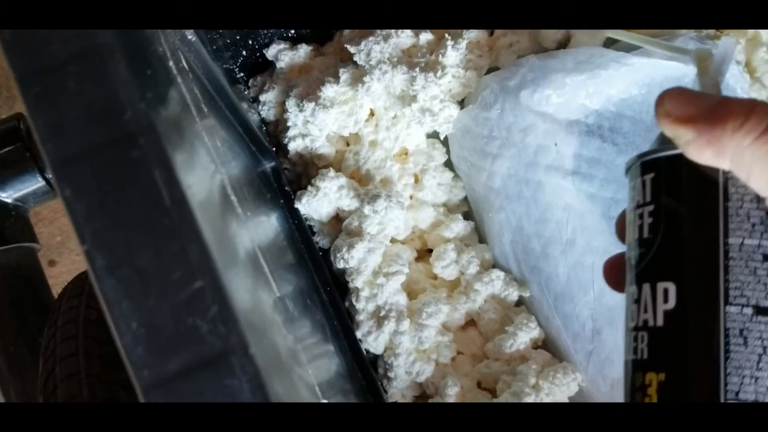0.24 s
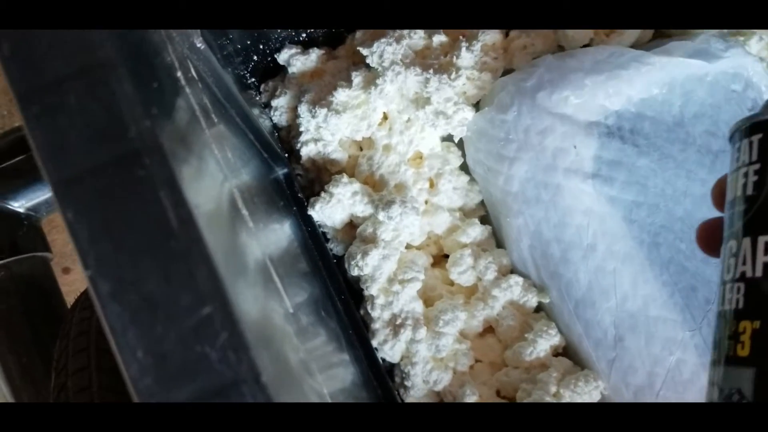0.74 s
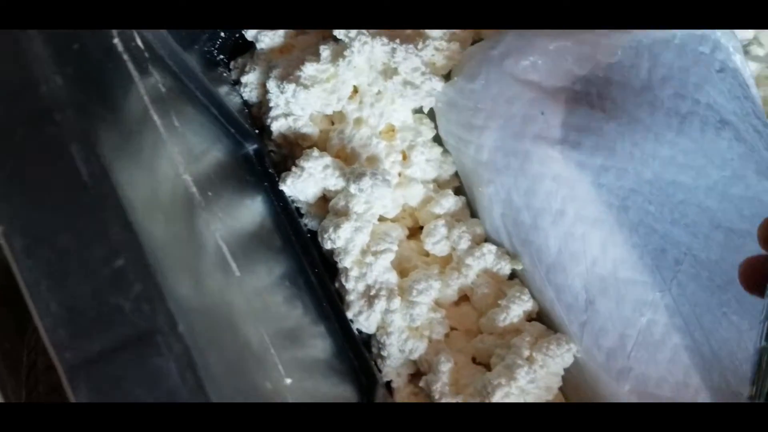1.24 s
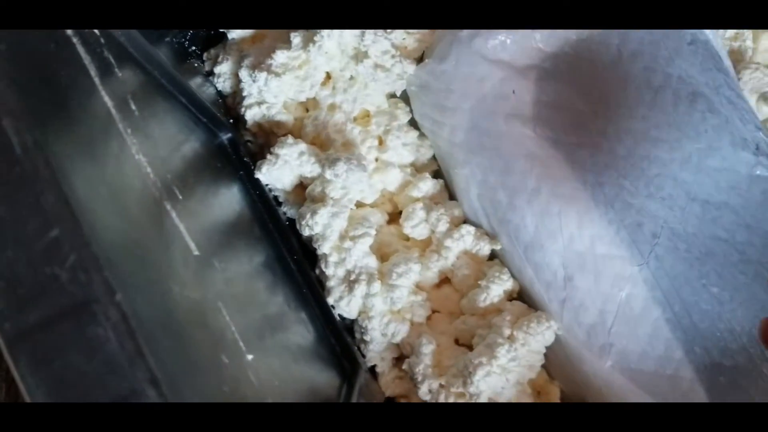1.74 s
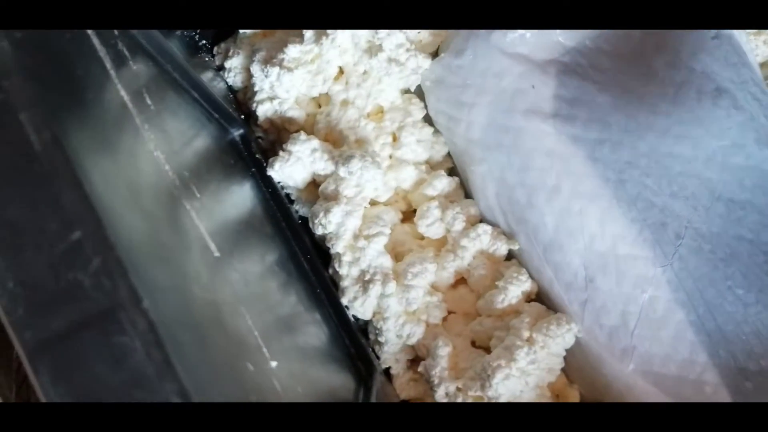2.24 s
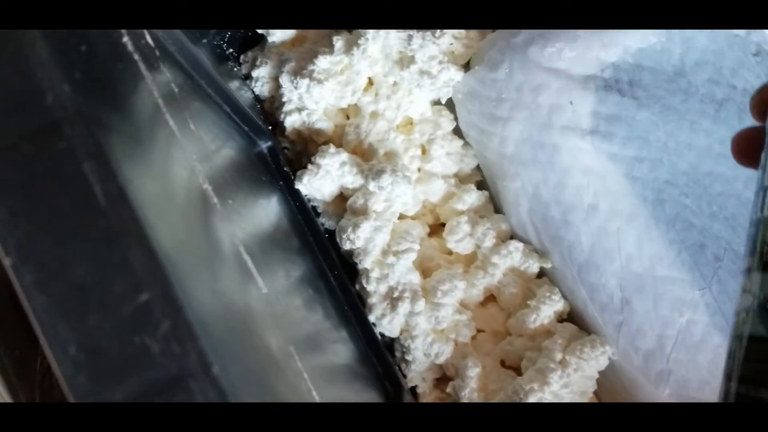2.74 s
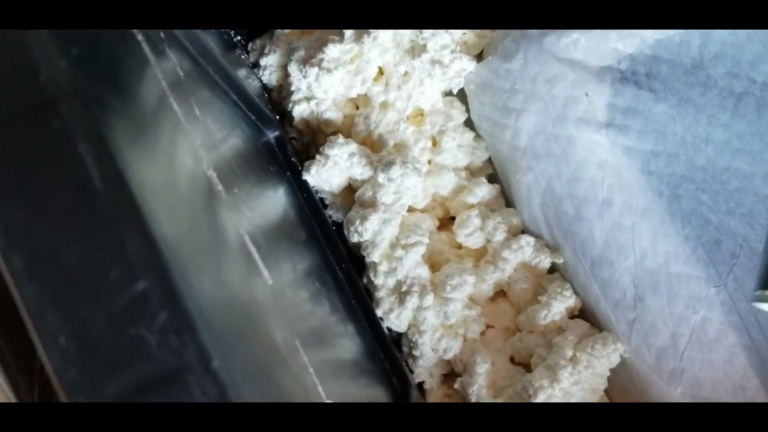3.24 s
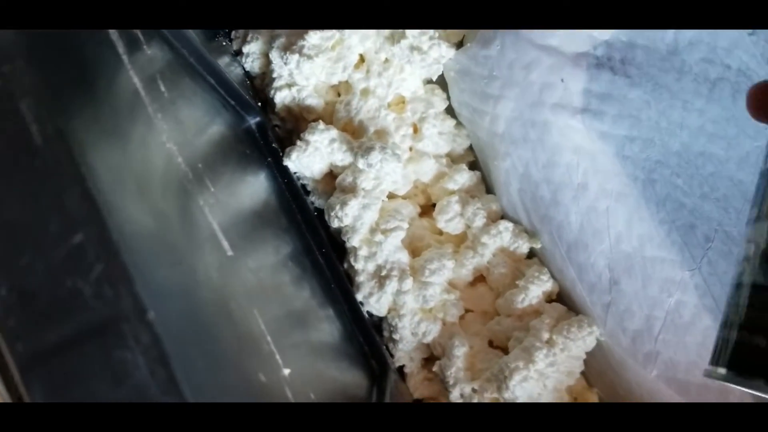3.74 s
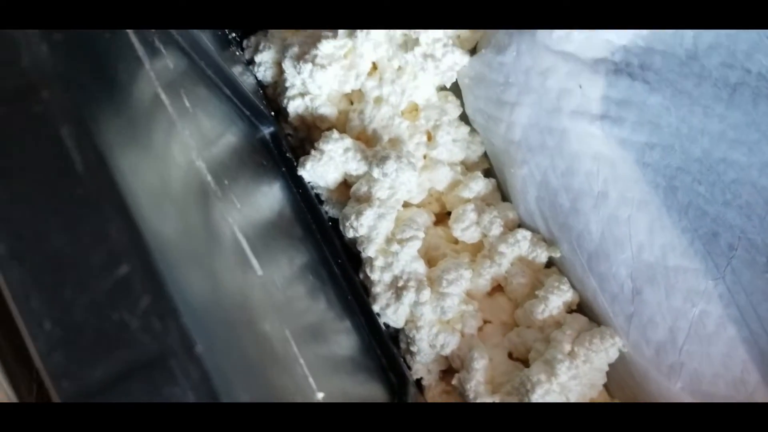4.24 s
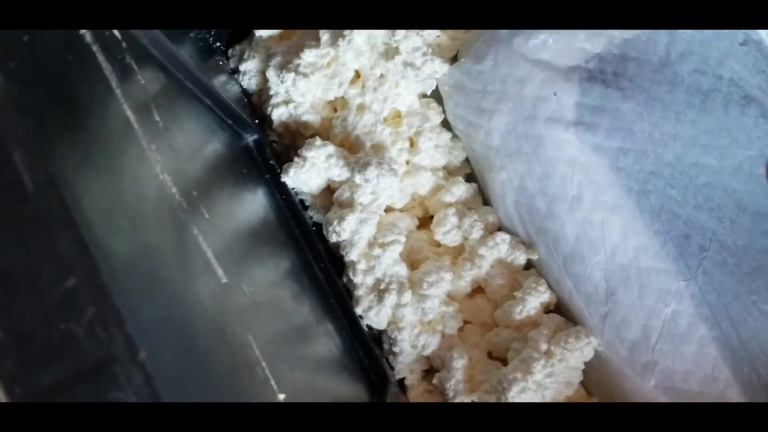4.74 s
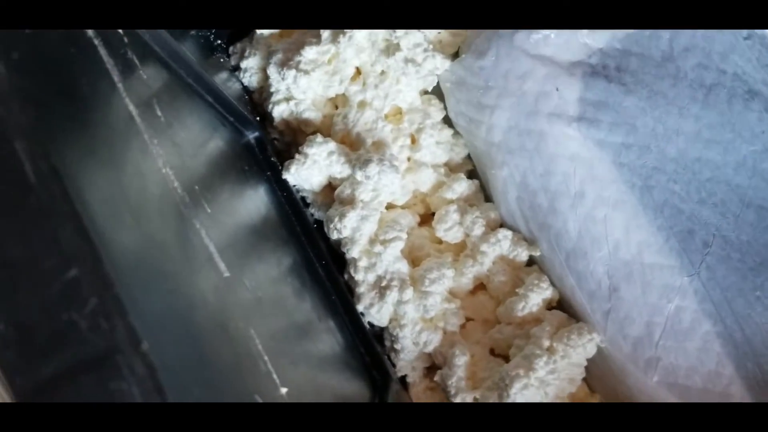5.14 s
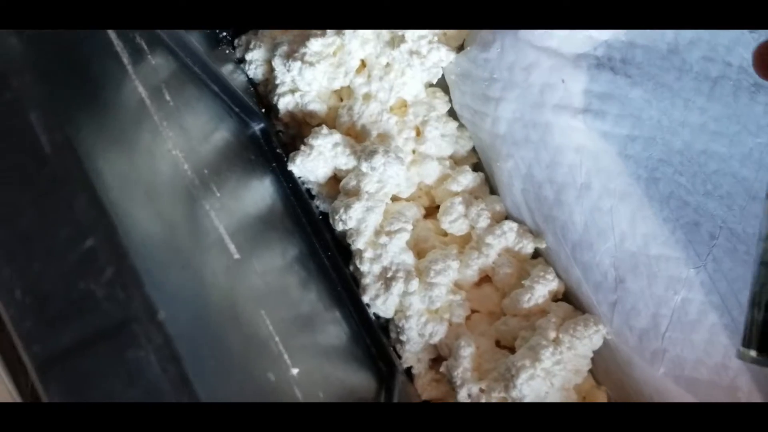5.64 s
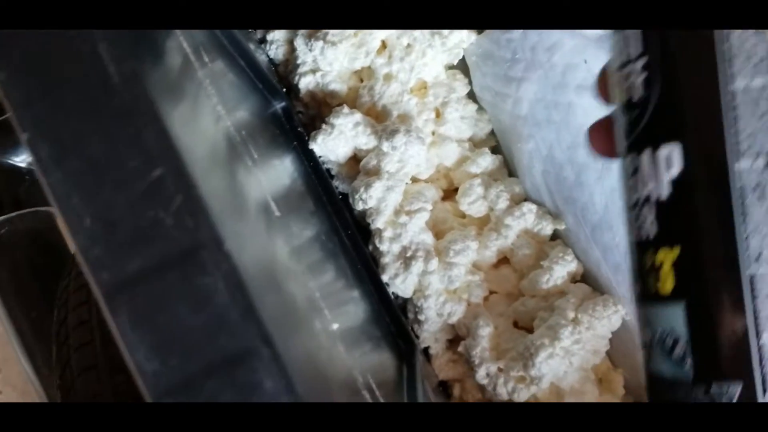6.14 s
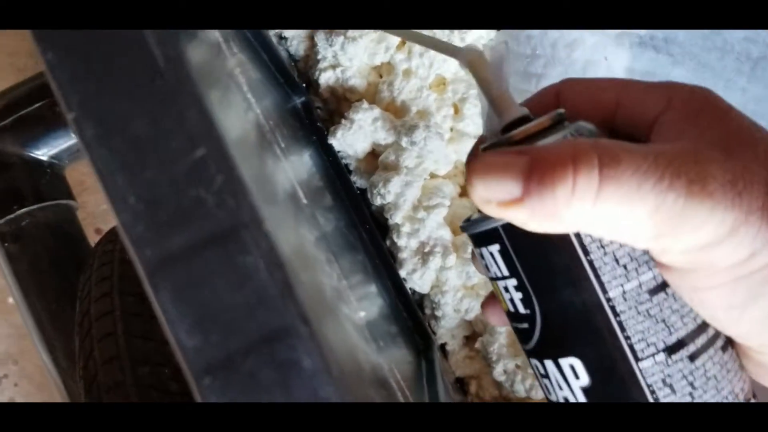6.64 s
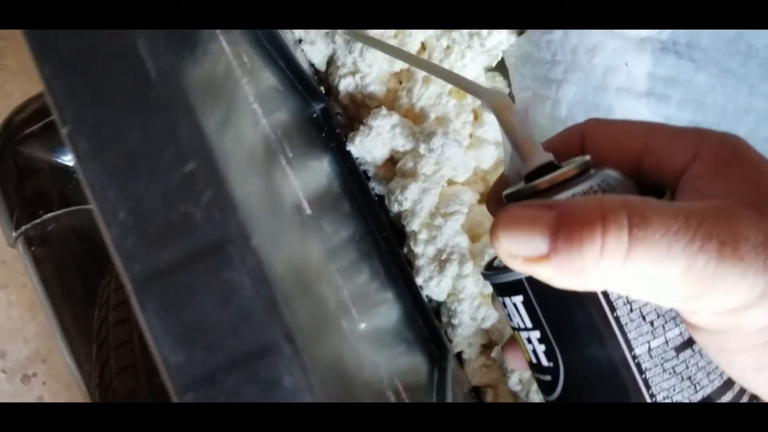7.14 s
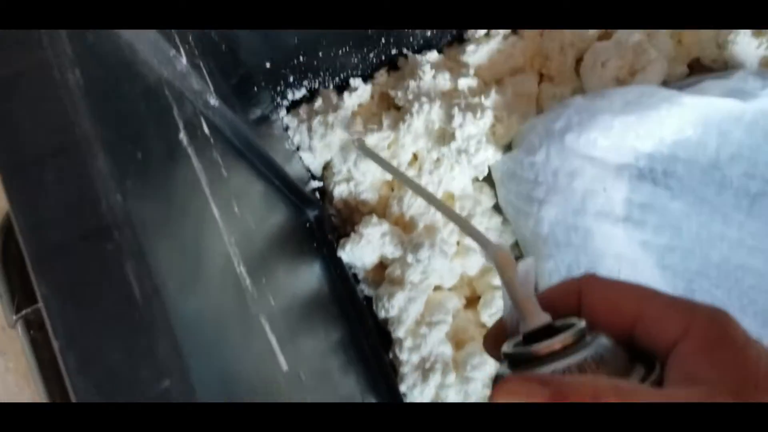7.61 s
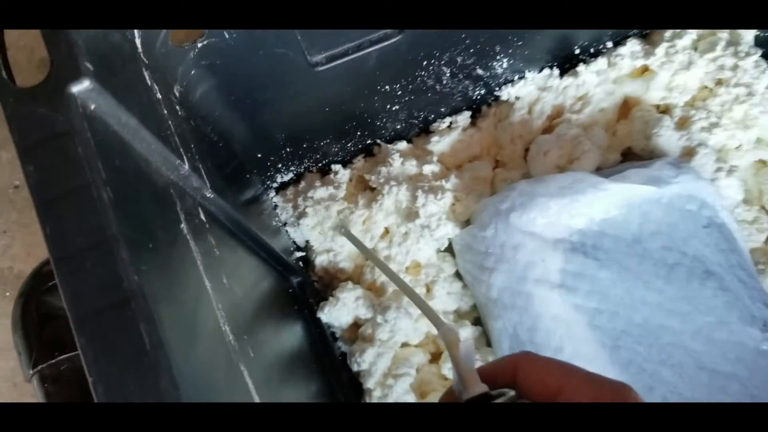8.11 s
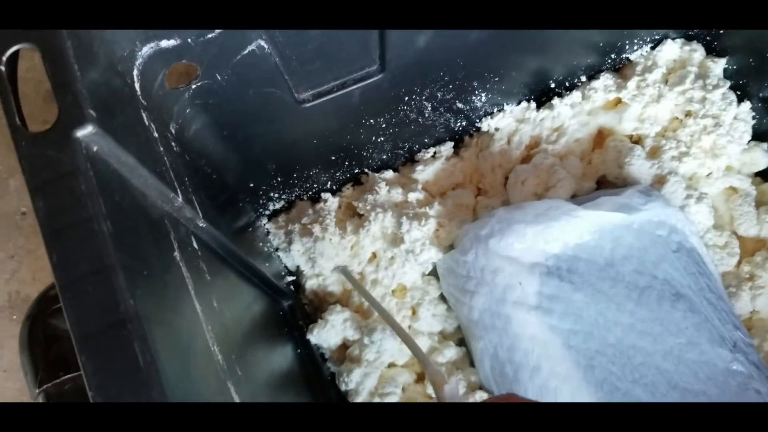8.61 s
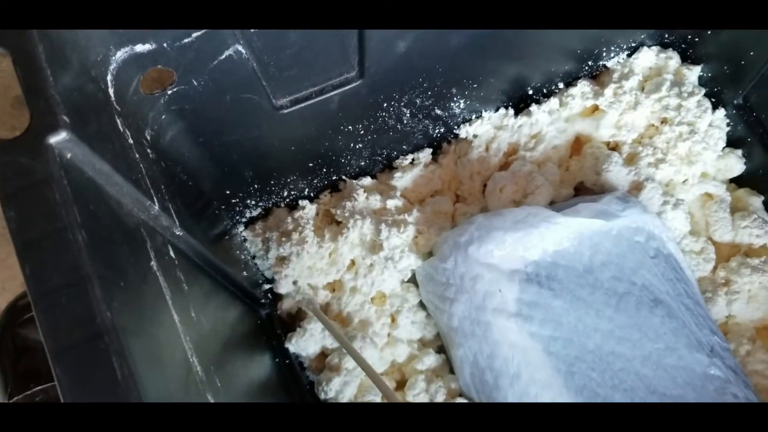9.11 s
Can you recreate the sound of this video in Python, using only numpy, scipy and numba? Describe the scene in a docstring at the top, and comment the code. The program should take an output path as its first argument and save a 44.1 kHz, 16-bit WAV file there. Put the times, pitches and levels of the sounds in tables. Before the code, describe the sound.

Close stereo pickup inside a plastic bin in a quiet workshop. An almost spent foam can blows gas through a straw, a continuous breathy hiss with fine fizzing, hollow pipe-like tones and quick swells. It brightens abruptly after two seconds, then flows smoother. Past six seconds the tip lifts out with a broad low rush, and the hiss becomes drier, breaking into rough spits that persist to the end.

```python
"""In a deep plastic bin in a quiet workshop, heard at two close microphone ports: an almost empty aerosol can
blows gas and foam through a straw. The jet is noise, gated by slugs of foam that choke it and burst free;
the straw rings as a pipe in low bands and hollows in the foam are moving resonances in the hiss.
Delayed copies are the near walls, which shift as the hand moves. At 6.2 s the tip lifts out of the foam
with a broad low rush. Low rumble and, for a while, a faint hum lie below."""
import sys
import numpy as np
from scipy import signal
from scipy.fft import rfft, irfft
from scipy.io import wavfile
from scipy.ndimage import uniform_filter1d
from numba import njit

SR = 44100
rng = np.random.default_rng(int(sys.argv[2]) if len(sys.argv) > 2 else 0)


def volts_from_db(level):
    """Convert decibel levels to linear amplitude ratios."""
    exponent = np.asarray(level, float) / 20
    return 10 ** exponent


def waveform_to_disk(signal):
    """Save audio, clipped to [-1, 1], as 16-bit WAV at the path in sys.argv[1]."""
    frames = np.transpose(np.atleast_2d(signal))
    scaled = np.clip(frames, -1, 1) * 32767
    samples = np.round(scaled).astype(np.int16)
    wavfile.write(sys.argv[1], SR, samples)


N = 413216

# the moving tip: (time [s], left microphone lag [ms], reach along the bin [0-1],
# size of the steady run of slugs [nominal dB, below 0 counts as 0])
PLACE = [(0, -0.018, 0.09, 7), (.5, 0.092, 0.1, 5), (1.3, 0.14, 0.33, 5.5), (1.8, 0.15, 0.33, 5),
         (2.5, 0.079, 0.28, 4), (3.1, 0.084, 0.65, 8.5), (4.4, 0.048, 0.8, -4.5), (5.0, 0.14, 0.86, -4),
         (5.55, 0.04, 0.79, 13), (5.68, -0.24, 0.77, 6), (6.13, -0.451, 0.49, 15), (6.3, -0.26, 0.27, 8),
         (7.0, -0.24, 0.26, 14), (7.5, -0.26, 0.29, 13), (8.2, -0.26, 0.31, 7.5), (9.37, -0.27, 0.29, 13)]
# gusts of gas on top of the flow: (time of peak [s], rise [dB], half-length [s], hollow pitch [Hz])
GUSTS = [(0.218, 1.5, 0.19, 4600), (0.656, 4.5, 0.1, 4700), (0.906, 1.5, 0.074, 3400),
         (1.043, 5.5, 0.051, 4100), (1.22, 5.5, 0.037, 3900), (1.434, 8.5, 0.12, 3900),
         (1.622, 6, 0.075, 3730), (1.8, 5, 0.23, 3380), (2.055, 6.5, 0.046, 3670), (2.638, 4, 0.072, 4260),
         (3.294, 6, 0.021, 4200), (4.007, 2, 0.11, 5840), (4.283, 3.5, 0.073, 3950), (4.572, 3, 0.16, 4150),
         (4.758, 4, 0.17, 3200), (5.584, 3.5, 0.26, 4200), (6.107, 1, 0.11, 4900)]
LIFT_S, LIFT_TAKES_S = 6.2, 0.083   # the tip leaves the foam


def rms_one(x):
    """Scale to unit power."""
    return x / np.sqrt(np.mean(x ** 2) + 1e-20)


def in_time(rows):
    """Columns of a table as curves, one value a sample."""
    s, *columns = np.transpose(rows)
    return [np.interp(np.arange(N) / SR, s, c) for c in columns]


def humps(rows, values):
    """Sum of smooth humps, one for each row of (time, _, half-length, ..), scaled by values."""
    out = np.zeros(N)
    for (s, _, length, *_), value in zip(rows, values):
        i = np.arange(max(int((s - length) * SR), 0), min(int((s + length) * SR), N))
        out[i] += value * np.cos(np.pi / 2 * (i / SR - s) / length) ** 2
    return out


def drift(rate_hz):
    """Slow chance wander of spread 1: noise through a double pole, drawn at every 40th sample."""
    r = np.exp(-80 * np.pi * rate_hz / SR)
    noise = rng.standard_normal(N // 40 + 2002)
    slow = signal.lfilter([1], [1, -2 * r, r * r], noise)[2000:]
    return np.interp(np.arange(N) / 40, np.arange(len(slow)), rms_one(slow))


def band(x, low_hz, high_hz, order=2):
    """Butterworth band-pass."""
    return signal.sosfilt(signal.butter(order, [low_hz, high_hz], "band", fs=SR, output="sos"), x)


def shaped(x, spectrum):
    """Colour by a spectrum of (Hz, dB), then scale to unit power."""
    hz, db = np.transpose(spectrum)
    bins = np.log(np.fft.rfftfreq(N, 1 / SR) + 1)
    gain = volts_from_db(np.interp(bins, np.log(hz), db, left=-90, right=-90))
    return rms_one(irfft(rfft(x) * gain, N))


@njit
def resonate(x, hz, width_hz):
    """Two-pole resonance with a moving centre, gain 1 on top."""
    out = np.zeros(len(x))
    for i in range(2, len(x)):
        r = np.exp(-np.pi * width_hz[i] / SR)
        drive = (1 - r * r) / 2 * (x[i] - x[i - 2])
        turn = 2 * r * np.cos(2 * np.pi * hz[i] / SR)
        out[i] = drive + turn * out[i - 1] - r * r * out[i - 2]
    return out


def tail(marks, ms):
    """Each mark dies away exponentially."""
    return signal.lfilter([1], [1, -np.exp(-1000 / (ms * SR))], marks + 1e-18)


def late(fine, ms):
    """Read a signal of double rate with a moving delay."""
    return np.interp(2 * (np.arange(N) - ms * SR / 1000), np.arange(2 * N), fine, left=0)


def lifted():
    """0 while the tip is buried, 1 once it is out of the foam."""
    return np.clip((np.arange(N) / SR - LIFT_S) / LIFT_TAKES_S, 0, 1)


def workshop():
    """Low rumble of jet and room, nearly alike in both ports, and a faint hum for a while."""
    # colour of the rumble: (pitch [Hz], relative level [dB])
    rumble = [(15, -57), (25, -25), (59, -19), (118, -16), (195, 0), (243, 1), (295, -2.5), (325, 2),
              (419, 0.5), (470, 0.5), (560, -18), (990, -120)]
    # (time [s], level [dB], thinning of the rumble's upper part [0-1])
    rumbling = [(0.0, -49.5, 0), (2.27, -44, 0.13), (2.48, -48, 0.), (3.18, -44.5, 0.), (6.0, -45.5, 0),
                (7.28, -43.5, 0.76), (8.0, -45, 0.9), (8.4, -45, 0.9), (9.37, -45.5, 1)]
    mid, side = (shaped(rng.standard_normal(N), rumble) for _ in range(2))
    side = volts_from_db(-18) * band(side, 223, 600) + volts_from_db(-23.5) * side
    level_db, thinned = in_time(rumbling)
    mid = mid - np.clip(thinned, 0, 1) * band(mid, 330, 610, order=1)

    on = np.interp(np.arange(N) / SR, [1.3, 1.4, 3.2, 3.38], [0, 1, 1, 0])
    hum_hz = 98 + 4.0 * drift(5.14)
    hum = volts_from_db(-62 + 2 * drift(1.6)) * on * np.sin(2 * np.pi * np.cumsum(hum_hz) / SR)
    return volts_from_db(level_db) * (mid + side * [[1], [-1]]) + hum


def near_wall(ports):
    """The closest wall cancels one pitch at each port; it glides as the tip moves."""
    # (time [s], left cancelled pitch [Hz], right cancelled pitch [Hz], cancellation [0-1])
    wall = [(0, 610, 990, 1), (.7, 865, 1050, 1), (1.6, 1170, 1170, 0), (2.2, 1070, 1050, 0),
            (2.45, 1600, 1510, 0.65), (3.7, 1490, 1250, 0.28), (5.0, 1680, 1490, 0.9), (5.7, 1220, 1520, 1),
            (6.15, 750, 1060, 0.9), (6.25, 760, 1000, 0), (6.3, 3050, 2710, 0.5), (6.7, 3100, 2800, 0.9),
            (7.2, 2870, 2820, 0.56), (7.9, 2600, 2370, 0), (8.3, 2650, 1700, 0.4), (9.37, 2650, 1640, 0)]
    *notch_hz, depth = in_time(wall)
    width_hz = np.interp(lifted(), [0, 1], [300., 800.])
    depth = np.clip(depth, 0, 1)
    return np.array([x - depth * resonate(x, hz, width_hz) for x, hz in zip(ports, notch_hz)])


def bin_walls(x, echo_db, longest_ms, sideways, hidden_db, count):
    """Direct sound and wall echoes at two ports; path lengths change as the tip moves and trembles.

    hidden_db: straight path against the echoes, tip buried and lifted, before the power is evened."""
    port_gap_ms = 0.485
    lag_ms, reach = in_time(np.array(PLACE)[:, :3])
    out_of_foam = lifted()
    tremor_ms = np.interp(out_of_foam, [0, 1], [.08, .05])
    fine = signal.resample_poly(x, 2, 1)
    direct = np.array([late(fine, lag_ms / 2), late(fine, -lag_ms / 2)])
    out = direct * volts_from_db(np.interp(out_of_foam, [0, 1], hidden_db))
    for k, (when, side, slope) in enumerate(rng.random((count, 3))):
        when = (k + when) / count      # walls at spread distances
        ms = .8 + longest_ms * when ** 1.5 + 2 * (slope - .3) * reach + tremor_ms * drift(1.5)
        skew_ms = port_gap_ms * (side - .5) + tremor_ms / 2 * drift(1.5)
        gap = lag_ms / 2 + sideways * skew_ms
        out += volts_from_db(echo_db - 4 * when) * np.array([late(fine, ms + gap), late(fine, ms - gap)])
    # echoes colour the sound, but its power over half a second stays that of the source
    power_in = uniform_filter1d(x ** 2, size=SR // 2)
    power_out = uniform_filter1d(np.mean(out ** 2, axis=0), size=SR // 2)
    return out * np.sqrt(power_in / power_out)


def crosswise(gain):
    """The sputtering jet rings the bin across its width: one port pushed while the other is pulled."""
    # (time [s], level [dB], pitch [Hz])
    across = [(0, -30, 2050), (.4, -30, 1710), (1.0, -26, 1730), (1.7, -27.5, 1750), (2.15, -34, 1700),
              (2.35, -44, 1900), (2.7, -27, 1900), (3.3, -28, 1610), (3.45, -35, 1600), (3.55, -31, 3500),
              (3.8, -21, 3500), (4.0, -40, 3500), (6.8, -43, 3300), (7.0, -39, 3250), (7.5, -29, 3280),
              (8.1, -30, 3220), (8.3, -40, 3250), (8.8, -35, 3250), (9.37, -36, 3250)]
    level_db, hz = in_time(across)
    width_hz = np.full(N, 450.)
    noise = rng.standard_normal(N) * gain ** .5
    ring = resonate(resonate(noise, hz, 2 * width_hz), hz, width_hz)
    return rms_one(ring) * volts_from_db(level_db) * [[1], [-1]]


def straw(soft):
    """Pipe modes of straw and bin: bands of softly sputtering noise, which swell for a while."""
    # (pitch [Hz], width [Hz], relative level [dB])
    modes = [(665.4, 346, 0), (1146, 322, -8.5), (1620, 238, -7.5)]
    # an upper mode swells: (time of peak [s], rise [dB], half-length [s], pitch of the mode [Hz])
    swells = [(.02, 15.5, 0.95, 1130), (0.956, 6.5, 0.61, 1130), (2.6, 8.5, 0.25, 1130),
              (3.264, 12, 0.53, 1130), (4.1, 11.5, 0.91, 1130), (5.51, 7.5, 1.05, 1130),
              (6.204, 12.5, 0.34, 1130), (7.2, 0.5, 3.4, 1130), (0.59, 12, 0.41, 1620),
              (1.55, 6, 1.1, 1620), (2.083, 8.5, 0.36, 1620), (3.31, 13, 0.36, 1620),
              (4.177, 11.5, 0.33, 1620), (4.646, 8, 0.13, 1620), (5.52, 5.5, 0.21, 1620),
              (6.046, 13, 0.28, 1620), (6.7, 8, 0.4, 1620)]
    # all modes together: (time [s], relative level [dB])
    ringing = [(0, -38.5), (.7, -39), (1.0, -35), (1.75, -38), (2.3, -32.5), (2.8, -36), (3.15, -32),
               (4.05, -33.5), (4.55, -38.5), (5.1, -35.5), (6.1, -36), (6.5, -35.5), (7.9, -36),
               (8.2, -41.5), (9.37, -39.5)]
    pipe = np.zeros(N)
    for k, (hz, width, db) in enumerate(modes):
        rises = [rise * (abs(at - hz) < width / 2) for _, rise, _, at in swells]
        ring = rms_one(band(soft[k % 2], hz - width / 2, hz + width / 2, order=3))
        pipe += ring * volts_from_db(db + humps(swells, rises))
    return pipe * volts_from_db(in_time(ringing)[0])


def rush(noise):
    """Broad low rush of the jet once the tip is out of the foam, slowly sinking."""
    level_db = np.interp(np.arange(N) / SR, [LIFT_S, N / SR], [-29, -36.5])
    return rms_one(band(noise, 840, 2060)) * lifted() * volts_from_db(level_db)


def sputter():
    """Gain on the jet: the flow sinks while a slug blocks the tip, then jumps as it blows out."""
    # single slugs of foam, deep and shallow:
    # (time of release [s], choke depth [nominal dB, before smoothing], choke length [ms])
    slugs = [(6.309, 15, 10), (6.727, 35, 6.1), (6.816, 4, 6.1), (6.947, 9, 7), (7.015, 33, 7.8),
             (7.096, 2, 7.2), (7.181, 9, 15), (7.537, 25, 13), (7.656, 26, 13), (7.681, 16, 7),
             (7.81, 18, 16), (7.916, 31, 8.1), (7.97, 16, 9.6), (8.024, 31, 8.9), (8.3884, 19, 13),
             (8.424, 29, 13), (8.4804, 12, 32), (8.501, 20, 16), (8.524, 32, 11), (8.561, 35, 17),
             (8.602, 17, 22), (8.647, 21, 10), (8.668, 24, 14.5), (8.743, 23, 11), (8.814, 39, 3.6),
             (8.859, 10, 9.8), (8.9045, 27, 11), (8.948, 12, 32), (8.9903, 14, 28), (9.013, 18, 12),
             (9.109, 29, 5.1), (9.135, 43, 8.7), (9.153, 23, 7), (9.211, 8, 16), (9.235, 6, 14),
             (9.322, 40, 18.7)]
    # a steady run of further slugs, and the decay of any burst
    run_per_s, run_choke_ms, burst_ms = 58., 7, 2.08
    size_db = np.maximum(in_time(PLACE)[2], 0)
    steps = rng.random((1000, 2))      # the run is almost even in time
    at = np.cumsum((.55 + .9 * steps[:, 0]) * SR / run_per_s).astype(int)
    at, chance = at[at < N], steps[at < N, 1]
    single = np.array(slugs)
    # the run leaves out slugs within 13 ms of a single one
    free = np.abs(at[:, None] / SR - single[:, 0]).min(axis=1) > .013
    depth = free * (.4 + 1.8 * chance) * size_db[at]
    run = np.c_[at / SR, depth, np.full(len(at), run_choke_ms)]

    choke, burst = np.zeros(N), np.zeros(N)
    for s, depth_db, ms in np.r_[single, run]:
        end, length = round((s - .001) * SR), round(max(ms, 2) * SR / 1000)
        if length < end < N:
            ramp = np.arange(length) / length      # closes slowly, opens fast
            choke[end - length:end] += max(depth_db, 0) * np.sin(np.pi * ramp ** 1.6) ** 1.86
            burst[end] += max(depth_db, 0)
    # two equal poles round off chokes and bursts
    slugs_db = signal.lfilter([.014 ** 2], [1, -2 * .986, .986 ** 2], tail(burst, burst_ms) - choke)
    fizz_db = 1.03 * drift(57.0) + .5 * drift(11.4)
    gain = volts_from_db(np.clip(slugs_db + fizz_db, -26, 9))
    return gain / np.sqrt(uniform_filter1d(gain ** 2, size=SR // 6))   # mean power stays near 1


def hollow(x, hz, width_hz, low_hz, high_hz, peak_db):
    """A band of the jet with a moving resonance standing out of it, at unit power."""
    wide = band(x, low_hz, high_hz)
    peak = rms_one(resonate(wide, hz, np.full(N, width_hz)))
    return rms_one(wide + volts_from_db(peak_db) * peak * np.std(wide))


def flow_hollow(eddies, hiss_db, hollow_hz, gust_db, clear):
    """Main hiss, coloured by the hollow in the foam around the tip, whose pitch shifts in gusts."""
    shifts = [hz - hollow_hz[int(s * SR)] for s, _, _, hz in GUSTS]
    hollow_hz = hollow_hz + humps(GUSTS, shifts) + 203 * drift(7.2)
    peak_db = 6 - 21 * clear + 0.38 * gust_db      # stands out less as the foam clears
    return hollow(eddies, hollow_hz, 680.0, 2880, 5480, peak_db) * volts_from_db(hiss_db + gust_db)


def lower_hollow(eddies):
    """Lower hollow in the foam: a resonance of moving pitch and level."""
    # (time [s], relative level [dB], pitch [Hz])
    lower = [(0, -27, 1840), (.42, -31, 1810), (.8, -28, 2450), (.95, -26.5, 3150), (1.1, -23, 3200),
             (1.3, -30, 2600), (1.55, -29, 2200), (1.74, -29.5, 2180), (1.8, -34, 2270), (2.1, -28.5, 2420),
             (2.27, -31, 2280), (2.45, -28, 3170), (2.75, -31, 2540), (3.07, -26, 2140), (3.13, -30, 2060),
             (3.55, -40, 2200), (4.2, -40.5, 2260), (4.4, -47.5, 2820), (4.83, -29, 2980),
             (5.08, -56, 2500), (5.45, -51, 2640), (5.75, -36, 2200), (5.92, -31.5, 1960),
             (6.08, -30, 1790), (6.12, -34, 2850), (6.21, -26, 3000), (6.3, -27.5, 2730),
             (6.68, -33.5, 2430), (7.3, -39, 2360), (8.0, -35, 2870), (8.5, -33, 2190), (9.37, -38, 2200)]
    level_db, hz = in_time(lower)
    return hollow(eddies, hz, 450., 1720, 3220, peak_db=4.) * volts_from_db(level_db)


def treble(edge_eddies, sizzle_eddies, gust_db, clear):
    """Edge hiss and sizzle above the hollows; the highest air opens as the foam clears."""
    # (time [s], edge hiss [relative dB], sizzle [relative dB])
    levels = [(0, -32, -38.5), (.13, -33, -35.5), (.6, -29.5, -34), (1.83, -37, -37), (2.19, -36.5, -41),
              (2.32, -22.5, -28.5), (2.55, -26, -27.5), (2.65, -24, -28.5), (3.1, -28.5, -31.5),
              (3.42, -24.5, -29), (3.5, -27, -31.5), (3.62, -26, -23), (4.07, -22.5, -24),
              (4.2, -29.5, -25), (4.8, -30.5, -26.5), (5.06, -31.5, -25.5), (5.5, -28.5, -27.5),
              (6.0, -27.5, -27), (6.18, -31, -27), (6.76, -27.5, -29.5), (6.84, -31, -25.5),
              (7.9, -31, -27), (8.25, -36.5, -29.5), (8.6, -32, -28.5), (8.92, -33, -28),
              (9.37, -32, -29.5)]
    # colour of the sizzle: (pitch [Hz], relative level [dB])
    colour = [(4880, -3.5), (8300, 0.5), (10200, 5.5), (11700, 3), (15100, -9), (15800, -10)]
    # colour of the highest air: (pitch [Hz], relative level [dB])
    air_above = [(12000, -30), (13500, 0), (15800, 0)]
    edge_db, sizzle_db = in_time(levels) + 0.64 * gust_db
    edge = rms_one(band(edge_eddies, 5280, 7250)) * volts_from_db(edge_db + 2.3 * drift(2.7))
    sizzle = shaped(sizzle_eddies, colour)
    air_db = -4 + 11 * clear
    sizzle = sizzle + (volts_from_db(air_db) - 1) * shaped(sizzle, air_above) * volts_from_db(-17)
    return edge + sizzle * volts_from_db(sizzle_db + 1.0 * drift(13.0))


def jet():
    """Turbulence, gated by the sputter, drives straw, foam hollows, edge hiss and sizzle.

    Returns low part, hiss, the part that comes straight, and the sputter gain."""
    # steady flow: (time [s], hiss [relative dB], hollow pitch [Hz])
    flow = [(0, -29, 3800), (.5, -25.5, 3900), (.9, -25, 4000), (1.15, -29.5, 3200), (1.7, -29, 3530),
            (2.2, -32.5, 4050), (2.33, -16.5, 4150), (2.6, -22, 3570), (2.95, -22.5, 3120),
            (3.1, -25.5, 3900), (3.55, -25.5, 3820), (3.7, -19.5, 3720), (4.08, -23.5, 4800),
            (4.2, -27, 3880), (4.55, -23, 4130), (4.85, -27, 3150), (4.95, -23.5, 4570), (5.2, -22.5, 4950),
            (5.9, -28.5, 3720), (6.76, -26.5, 3480), (6.84, -19.5, 3800), (7.9, -25.5, 3830),
            (8.2, -27.5, 3970), (8.5, -26.5, 4400), (9.37, -24, 3930)]
    # foam around the tip clears: (time [s], clearness [0-1])
    clearing = [(0, 0.), (2.2, 0.47), (2.4, 0.41), (3.6, 0.6), (5.0, 0.8), (7.0, 1.), (9.37, 0.8)]
    hiss_db, hollow_hz = in_time(flow)
    clear, = in_time(clearing)
    gust_db = humps(GUSTS, [db for _, db, _, _ in GUSTS])
    gain, out_of_foam = sputter(), lifted()

    droplets_per_s = 350 + 290 * clear
    snaps = (rng.random(N) < droplets_per_s / SR) * np.minimum(rng.exponential(1, N), 2)
    # the main hollow's eddies are unrelated to those of the lower hollow and the edge hiss
    eddies = rng.standard_normal((2, N)) * (1 + 4.2 * snaps)
    upper = flow_hollow(eddies[0] * gain, hiss_db, hollow_hz, gust_db, clear)
    lower = lower_hollow(eddies[1] * gain ** 0.35)
    broad = rms_one(band(eddies[1] * gain, 1520, 2350)) * volts_from_db(hiss_db - 17)   # faint, between resonances
    high = treble(eddies[1] * gain, eddies[0] * gain, gust_db, clear)
    # low modes are fed by the whole straw and smooth the sputter
    soft = rng.standard_normal((3, N)) * gain ** .5
    low = straw(soft) + rush(soft[2]) + (lower + broad) * out_of_foam

    buried = lower * (1 - out_of_foam)
    straight_share = .7   # of the buried hollow's power, alike in both ports
    hiss = buried * np.sqrt(1 - straight_share) + broad * (1 - out_of_foam) + upper + high
    return low, hiss, buried * np.sqrt(straight_share), gain


def scene():
    """Low modes meet few echoes, mostly from one side once the tip is lifted; the hiss meets many."""
    low, hiss, straight, gain = jet()
    low = bin_walls(low, echo_db=-10.5, longest_ms=3.48, sideways=1 - .7 * lifted(),
                    hidden_db=(0, 0), count=3)
    # foam screens the straight path of the hiss until the lift
    high = bin_walls(hiss, echo_db=-5, longest_ms=6.5, sideways=1, hidden_db=(-9, 1), count=7)
    in_bin = near_wall(low + high + straight)
    return volts_from_db(2.5) * in_bin * volts_from_db([[.4], [-.4]]) + crosswise(gain) + workshop()


def band_limit(x):
    """A steep low-pass at the top of the band."""
    return signal.sosfilt(signal.butter(12, 16600, fs=SR, output="sos"), x)


def record(dry):
    """The microphones' mix, with only the highest peaks rounded."""
    held = dry / (1 + np.abs(dry / .95) ** 8) ** .125
    return band_limit(held)


dry = scene()
out = record(dry)
waveform_to_disk(out)
```